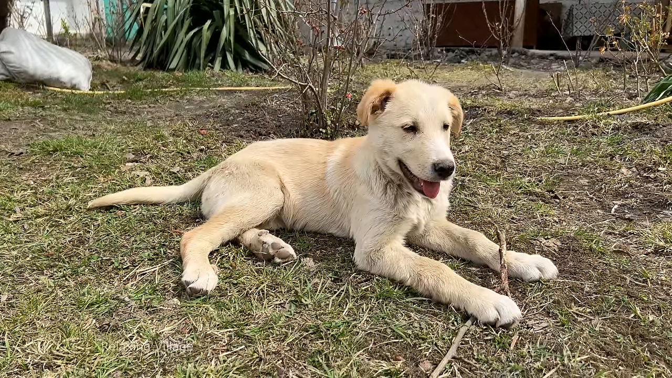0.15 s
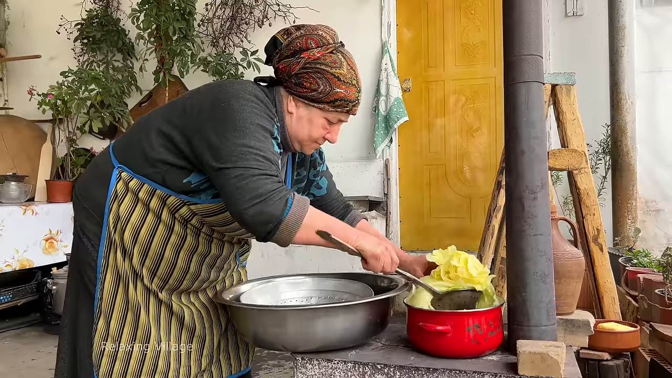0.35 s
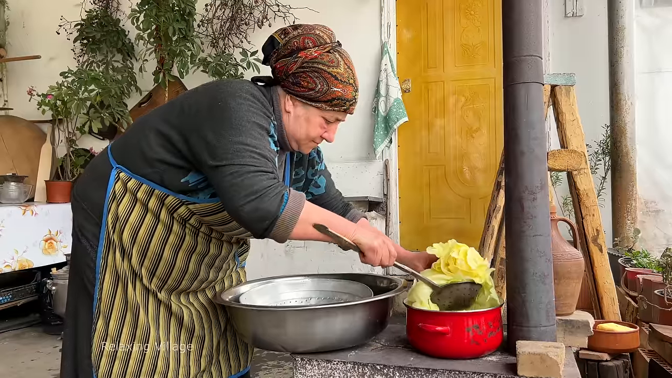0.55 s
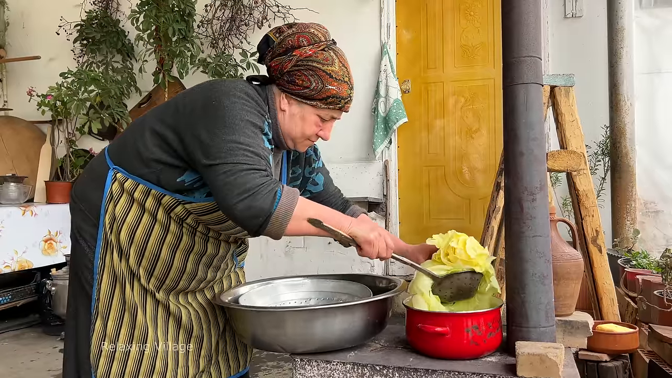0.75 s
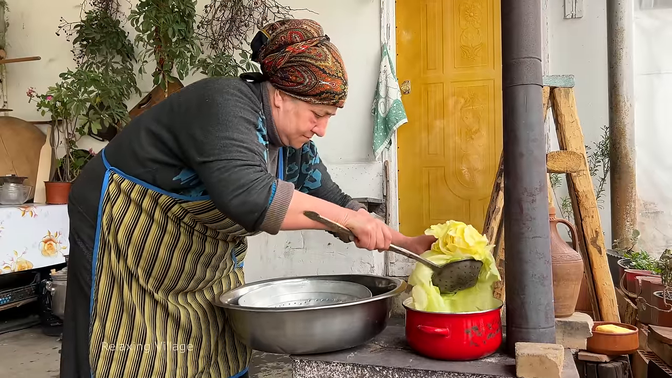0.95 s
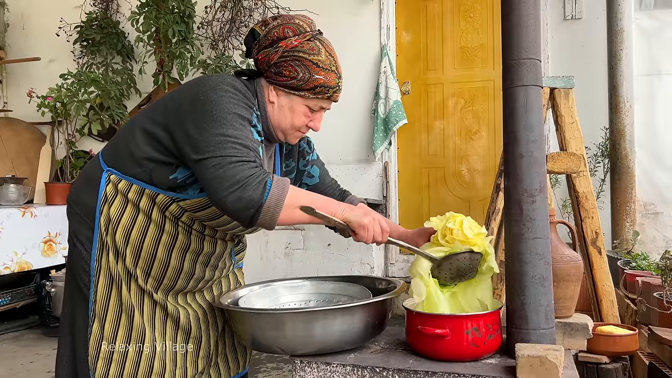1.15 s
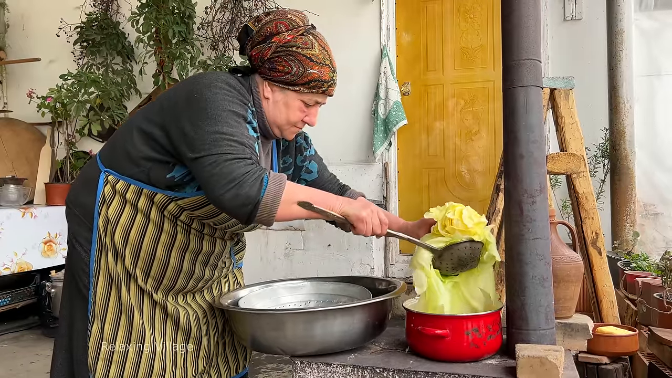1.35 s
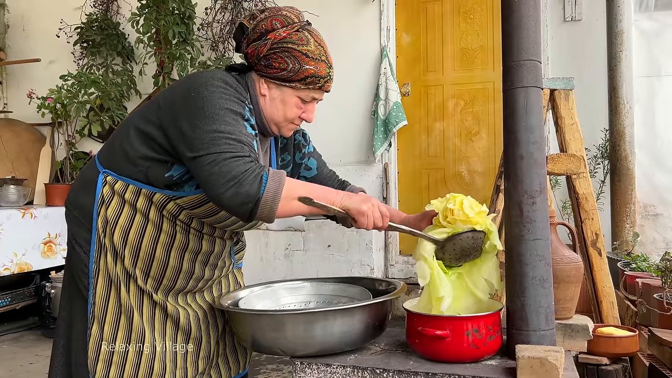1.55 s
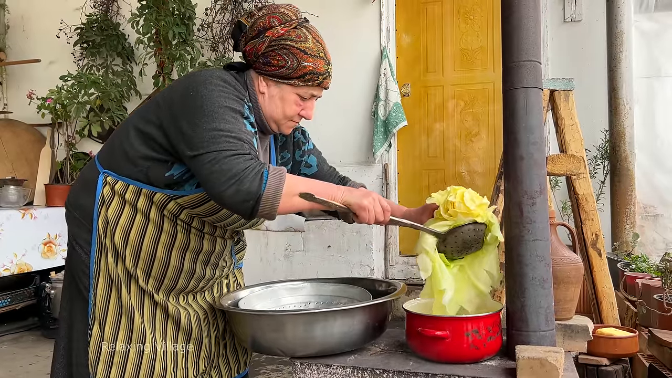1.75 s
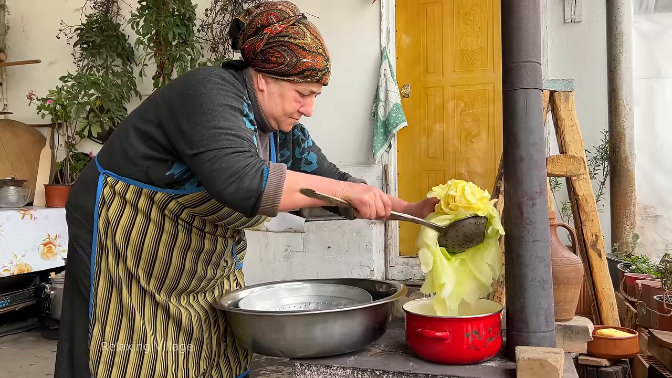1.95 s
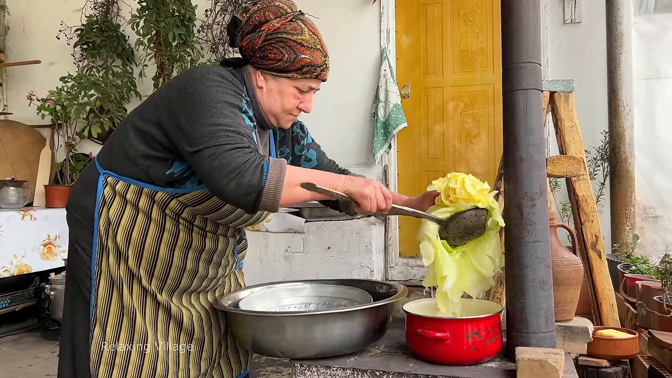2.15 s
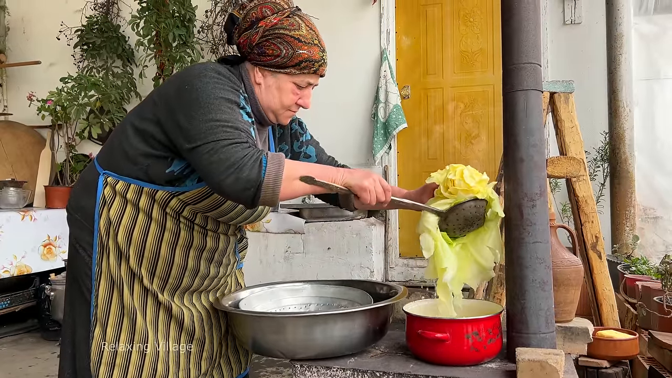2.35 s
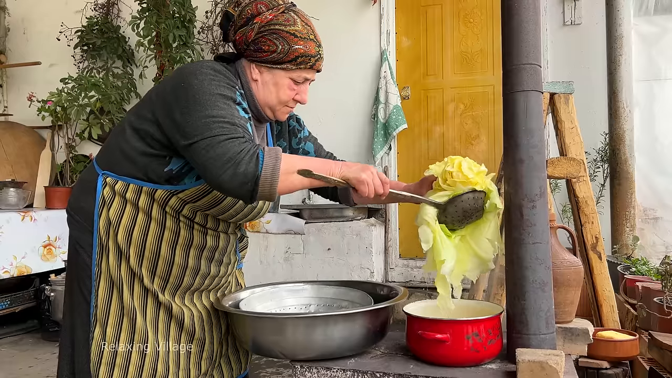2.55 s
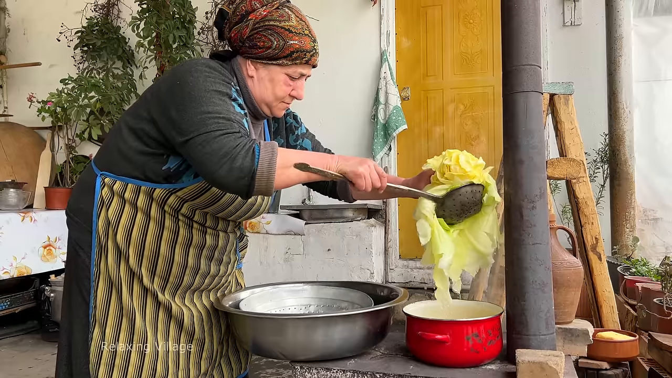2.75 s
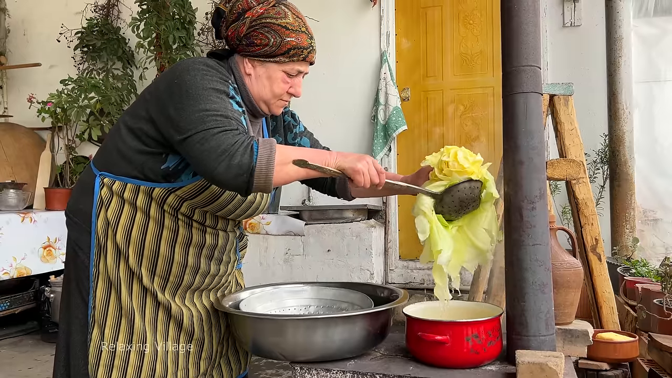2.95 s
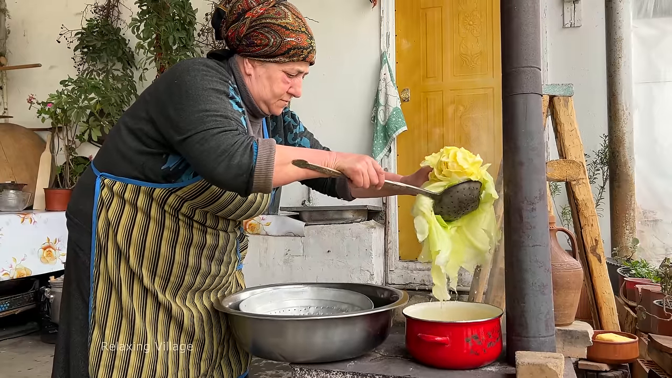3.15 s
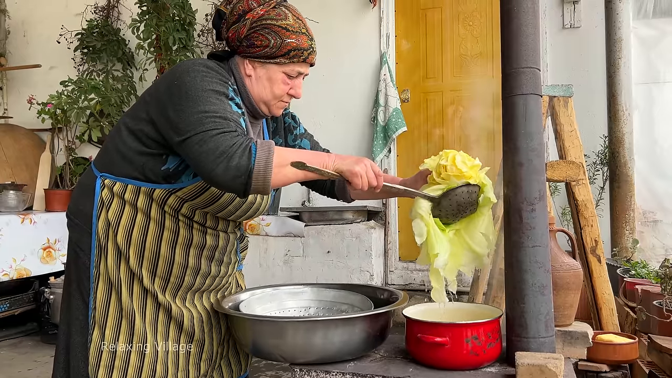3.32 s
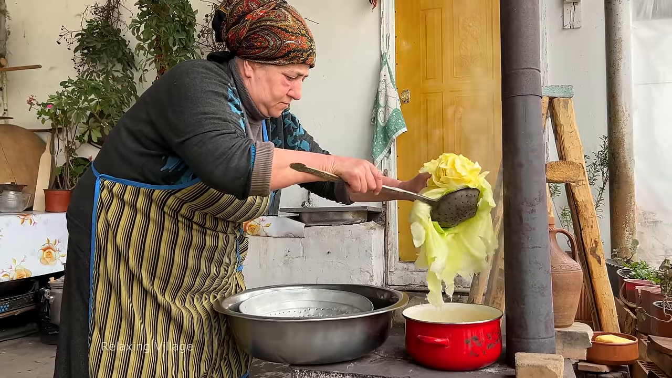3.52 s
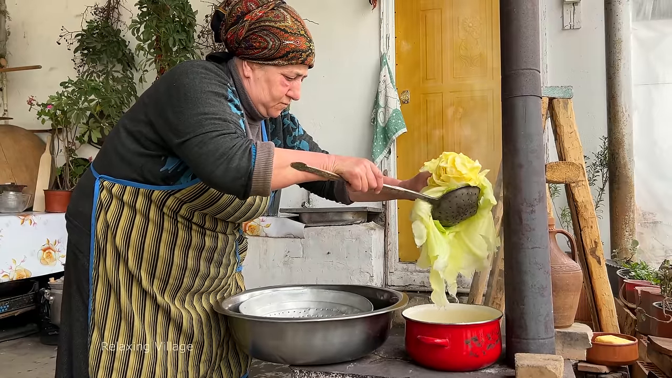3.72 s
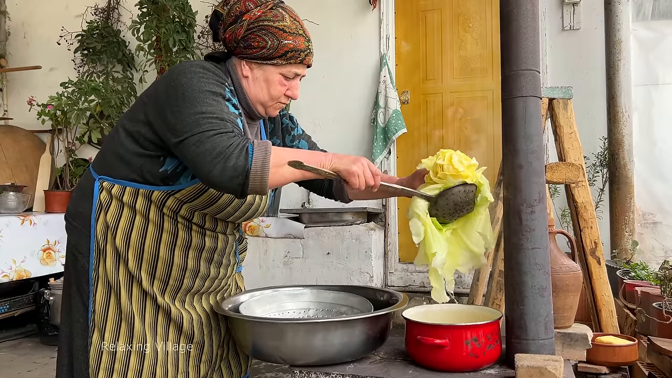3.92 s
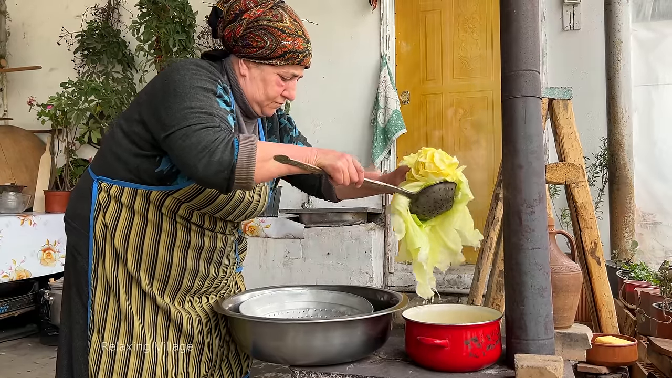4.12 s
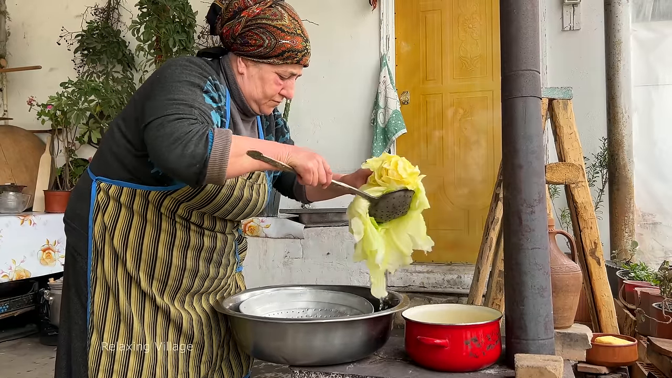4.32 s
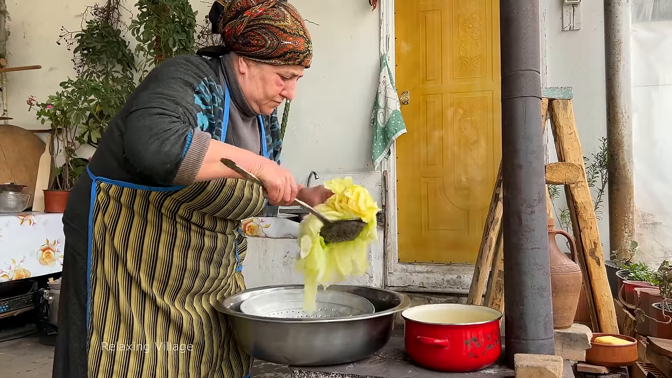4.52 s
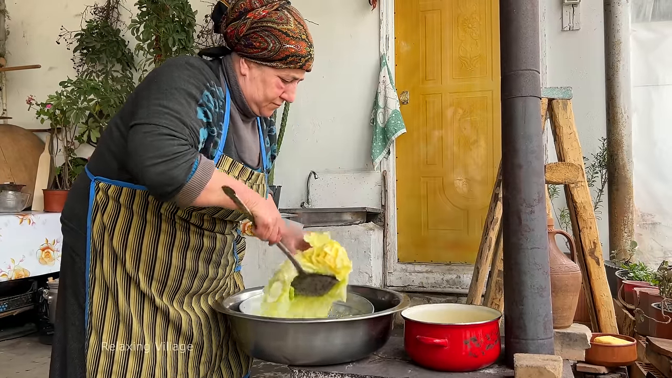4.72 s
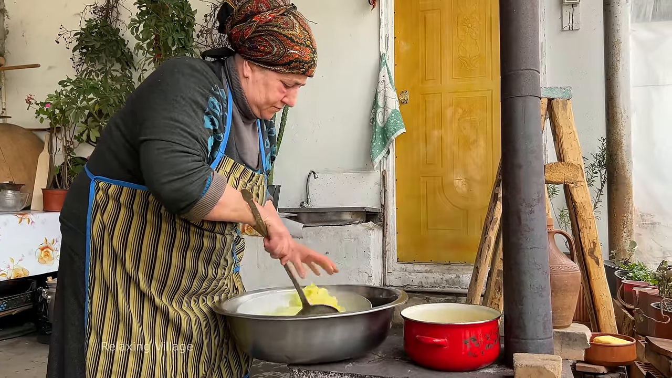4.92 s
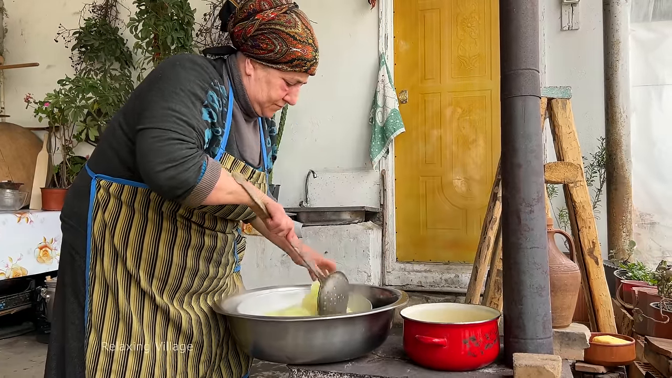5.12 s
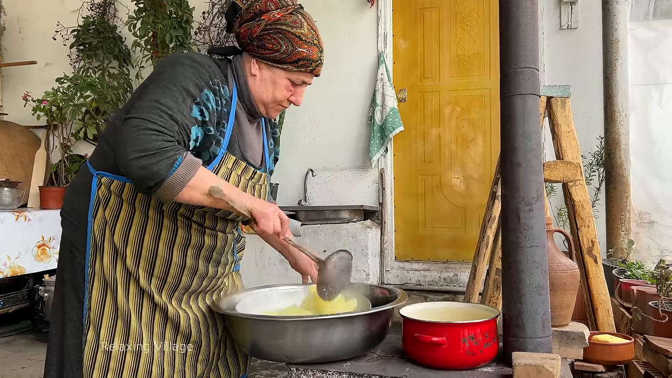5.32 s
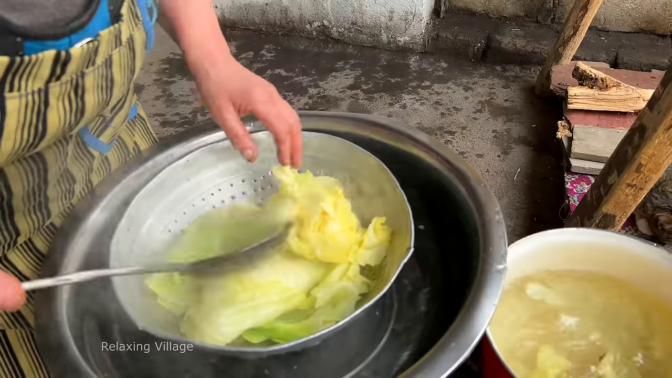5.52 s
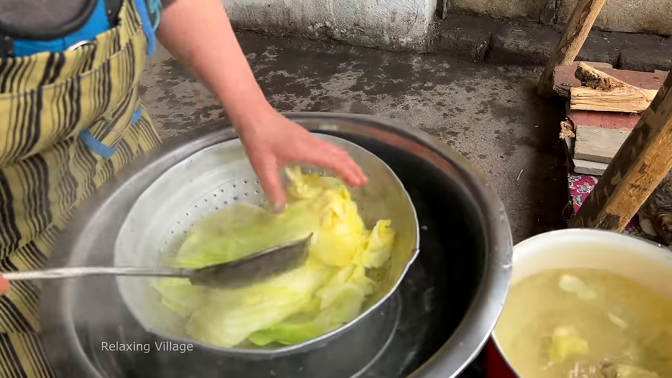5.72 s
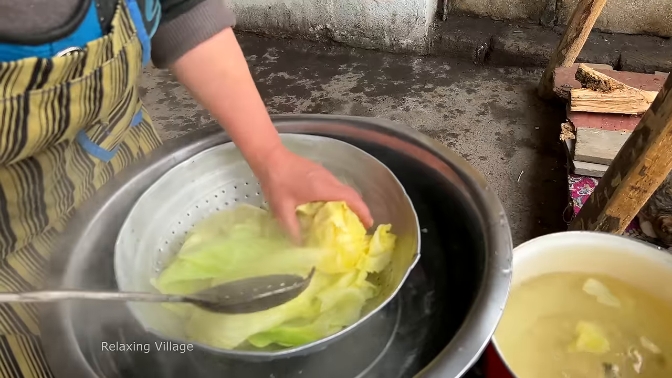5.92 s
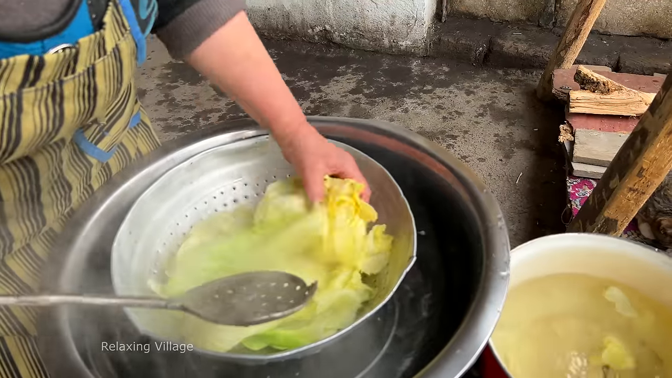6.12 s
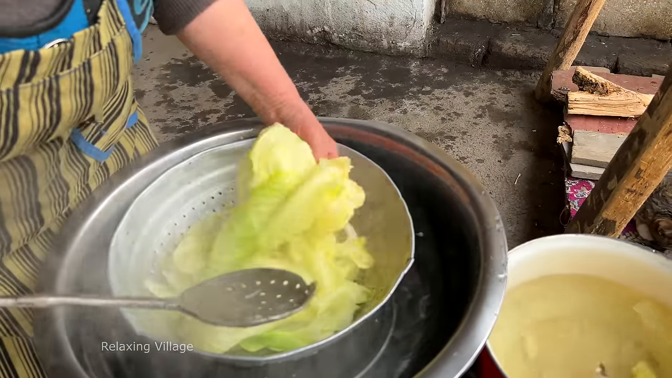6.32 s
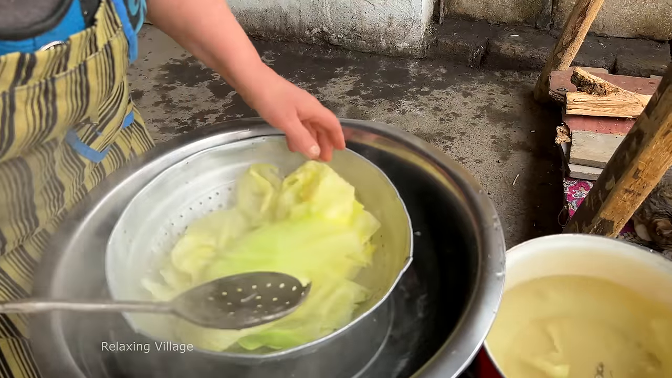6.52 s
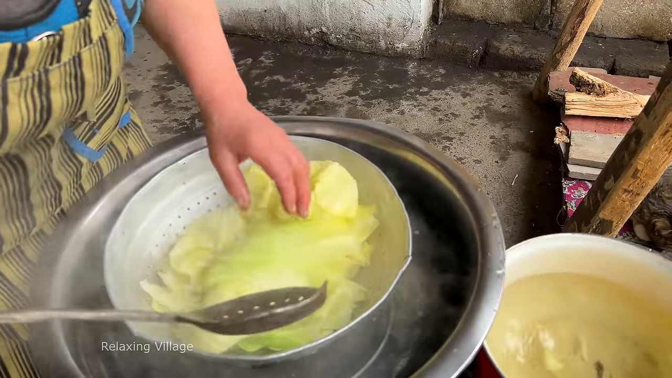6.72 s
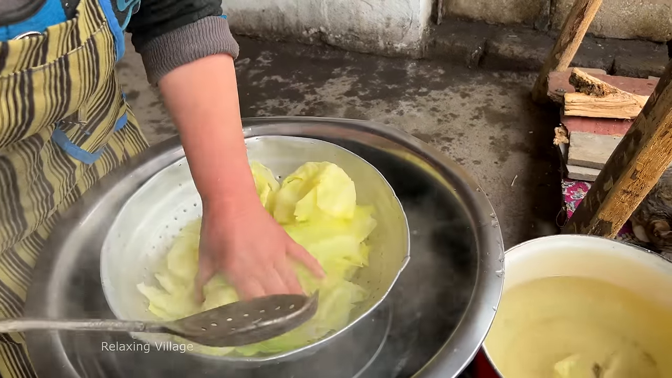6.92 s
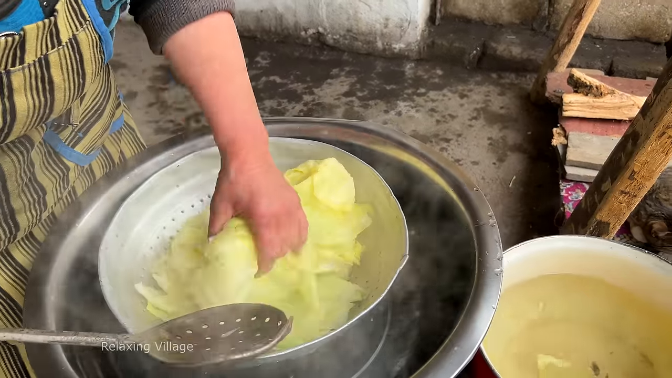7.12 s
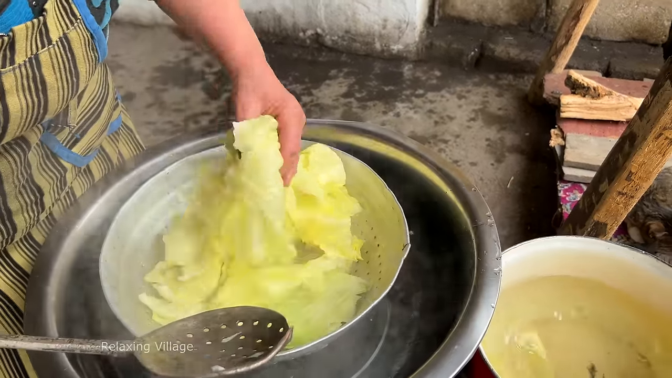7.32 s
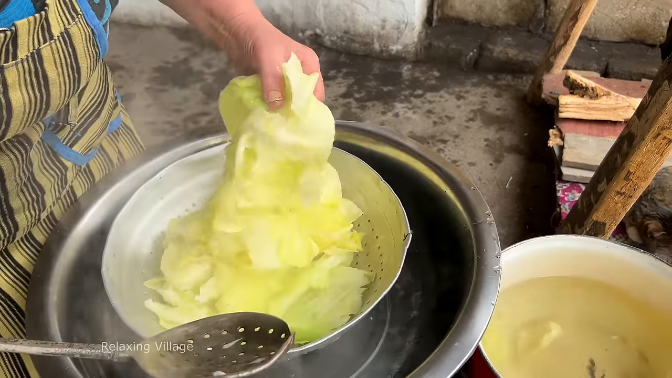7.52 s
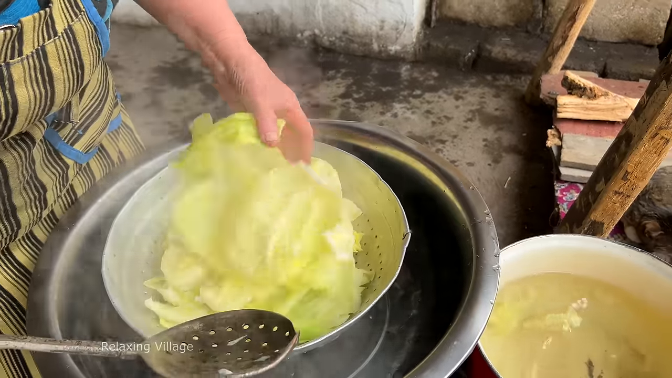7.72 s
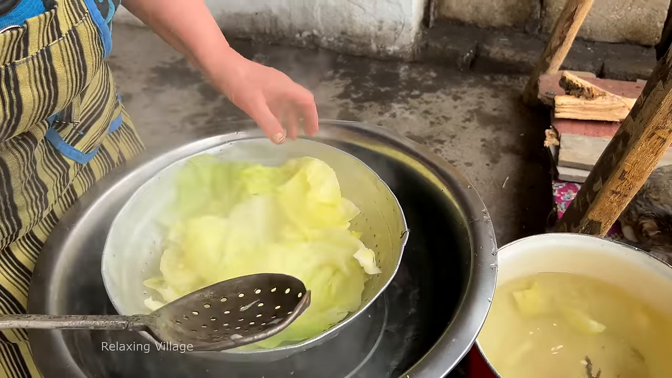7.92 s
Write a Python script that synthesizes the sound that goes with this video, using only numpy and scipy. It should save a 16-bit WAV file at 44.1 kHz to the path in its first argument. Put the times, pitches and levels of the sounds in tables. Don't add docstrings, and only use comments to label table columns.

```python
import sys
import numpy as np
from scipy import signal
from scipy.fft import rfft, irfft, next_fast_len
from scipy.io import wavfile
from scipy.ndimage import uniform_filter1d, map_coordinates

SR = 44100
rng = np.random.default_rng(int(sys.argv[2]) if len(sys.argv) > 2 else 0)


def wav_record(signal):
    frames = np.transpose(np.atleast_2d(signal))
    bounded = np.clip(frames, -1, 1)
    quanta = np.round(bounded * 32767).astype(np.int16)
    wavfile.write(sys.argv[1], SR, quanta)


def undo_db(level):
    steps = np.asarray(level, float) / 20
    return 10 ** steps


N = 355446

# time in seconds, level in dB.
AIR_RUMBLE = [(0.0, -57), (0.09, -57.5), (0.54, -66.5), (0.76, -70.5), (1.28, -65), (1.8, -70), (2.31, -59),
              (2.69, -60), (2.92, -60.5), (3.14, -56), (3.46, -64), (3.66, -55), (3.81, -55), (4.02, -60),
              (4.37, -53), (4.69, -59), (4.96, -53), (5.39, -65), (5.57, -64), (5.72, -57), (6.04, -64),
              (6.58, -58), (6.89, -64), (8.06, -62.5)]
# frequency in Hz, density in dB per Hz.
RUMBLE_COLOUR = [(13, -32), (22, -22.5), (35, -17), (54, -0.5), (102, 1), (162, -5.5), (200, -4.5),
                 (260, -30), (440, -120)]
# time in seconds, pitch in Hz, drone level in dB, sub-bass level in dB.
ENGINE = [(3.52, 66, -66, -69), (3.564, 65.5, -40, -42), (3.682, 65.4, -33, -55), (3.742, 67.7, -42, -53),
          (3.852, 66.4, -28, -52), (3.916, 70.9, -40.5, -44), (4.144, 68, -40.5, -46),
          (4.188, 63.5, -37.5, -48), (4.208, 64.5, -48, -53), (4.242, 66.8, -33.5, -51),
          (4.348, 66.9, -34, -59), (4.406, 67, -46.5, -54), (4.516, 66.5, -33.5, -48),
          (4.59, 66.7, -46, -56), (4.634, 70, -35.5, -63), (4.748, 73.1, -49, -63), (4.842, 72.2, -41, -73),
          (4.982, 71.1, -48, -63), (5.224, 71.9, -59.5, -61), (5.3, 70.6, -55, -90)]

# time in seconds, peak in dB, pitch in Hz.
DRIPS = [
    (0.588, -66, 608),
    (0.615, -44, 1410),
    (0.69, -41.5, 760),
    (0.846, -38, 1870),
    (0.954, -38.5, 756),
    (1.048, -35.5, 2360),
    (1.196, -43.5, 1740),
    (1.322, -32.5, 696),
]
# time in seconds, peak in dB, pitch in Hz.
PLOPS = [(1.396, -39, 1190), (1.945, -46, 820), (2.022, -35, 824), (2.097, -42, 1260), (2.122, -45, 794),
         (2.151, -44, 638), (2.166, -36.5, 795), (2.363, -54, 1130), (2.473, -39, 1260), (2.627, -41, 690),
         (2.729, -45, 760), (2.747, -33, 814), (2.768, -42, 650), (2.797, -31.5, 662), (2.815, -33.5, 1194),
         (2.862, -36.5, 800), (2.898, -52, 870), (2.912, -34, 1220), (3.054, -40.5, 740),
         (3.095, -38.5, 853), (3.104, -41, 760), (3.118, -34, 1320), (3.128, -35, 804), (3.156, -31.5, 758),
         (3.177, -38.5, 797), (3.198, -35, 787), (3.209, -36, 729), (3.248, -37, 802), (3.291, -42, 617),
         (3.31, -40, 1210), (3.349, -44, 820), (3.369, -35.5, 810), (3.384, -36, 837), (3.505, -41, 1220),
         (3.614, -43.5, 781), (3.677, -50, 556), (3.678, -35.5, 815), (3.761, -32.5, 843),
         (3.996, -33.5, 775), (4.07, -41.5, 1290), (4.095, -35.5, 1050), (4.162, -37.5, 1200),
         (4.221, -35.5, 1140), (4.385, -56, 1220), (4.412, -32, 1390), (4.414, -26, 1066)]
# time in seconds, peak in dB, pitch in Hz.
SMALL_DROPS = [(0.5887, -48.5, 3130), (0.6895, -50, 1720), (0.9438, -51, 2200), (0.965, -44.5, 1410),
               (1.3214, -34, 2600), (1.3962, -34, 2600), (3.4241, -41, 1590), (3.5043, -42, 1620),
               (4.4711, -30.5, 1670), (5.7424, -50, 1890), (6.464, -39, 2860)]
# time in seconds, peak in dB, pitch in Hz.
SKIMMER_RINGS = [
    (.975, -57, 1350),
    (1.056, -60, 2550),
    (6.506, -49, 2800),
    (6.53, -49, 3300),
    (6.735, -54, 5500),
]
# time in seconds, peak in dB, pitch in Hz.
LEAF_TICKS = [(5.498, -36.5, 4930), (5.522, -46, 1030), (5.63, -39, 1110), (5.767, -51, 802),
              (6.469, -44, 1140), (6.51, -39, 2800), (6.54, -32, 3300), (6.589, -34.5, 864),
              (6.915, -44, 2450), (7.11, -44, 2950), (7.283, -29.5, 3520), (7.354, -31.5, 1170),
              (7.562, -40, 880), (7.579, -33, 899), (7.773, -51, 1290), (7.798, -41.5, 1180),
              (7.962, -47, 890)]
# time in seconds, peak in dB, pitch in Hz.
FLOOR_THUDS = [(4.416, -27, 114), (4.846, -17, 256.5), (5.528, -33, 225), (5.57, -31, 236),
               (5.59, -25.5, 215), (5.766, -32.5, 213), (5.978, -36, 240), (6.266, -43, 224),
               (6.461, -40, 292), (6.588, -38, 226), (7.354, -33, 189), (7.573, -35, 216),
               (7.901, -39, 288), (7.975, -45, 233)]
# time in seconds, peak in dB, crack in dB, spray in dB (both relative), T60 in seconds.
KNOCKS = [(3.115, -39, -2.5, 3, 0.073), (4.412, -25, -33, -1, 0.053), (4.846, -12.5, -31, -27, 0.065),
          (4.891, -13, -33, -33, 0.09), (4.941, -13.5, -12, -14, 0.048), (5.53, -33, -33, -27, 0.024),
          (5.588, -24.5, -41, -31, 0.088), (5.631, -36.5, -7, -13, 0.13), (5.739, -37.5, -13, -20, 0.031),
          (5.768, -31, -20, -25, 0.027), (5.867, -52.5, -8, -9, 0.044), (5.979, -36, -11, -17, 0.067),
          (6.46, -32, -13, -22, 0.057), (6.537, -43.5, -7, 10, 0.038), (6.587, -31, -30, -20, 0.074),
          (6.739, -39, -16, -10, 0.067), (6.857, -53, -4, 17, 0.037), (6.914, -49, 1.5, 5, 0.089),
          (7.111, -45, -16, -18, 0.073), (7.281, -44, -4, -7, 0.079), (7.351, -39, -34, 11.5, 0.098),
          (7.564, -30, -20, -19, 0.13), (7.777, -41.5, -33, -20, 0.06), (7.819, -37.5, -6, 0, 0.086),
          (7.973, -35.5, -37, -31, 0.098)]

# frequency in Hz, width in Hz, level in dB.
COLANDER_MODES = [(216, 22, 1.5), (247, 11.7, 6.5), (300.4, 17.3, 0.5), (368, 67, -4.5), (457, 31, 1.5),
                  (537, 23, 6.5), (623, 62, -1), (698, 28, -1), (819, 30, -3), (933, 45, -7),
                  (1126, 49, -7), (1600, 29, -10.5), (2130, 150, -32.5)]
# frequency in Hz, width in Hz, level in dB.
POT_MODES = [(747, 217, -15), (1220, 47, 1.5), (1870, 210, 2), (2680, 190, -4)]
# frequency in Hz, density in dB per Hz.
VESSEL_COLOUR = [(90, -76), (150, -14.5), (200, -6.5), (340, -1.5), (650, -12.5), (1200, -13.5),
                 (1700, -37), (2600, -120)]
# frequency in Hz, density in dB per Hz.
SLOSH_COLOUR = [(350, -25), (600, -10), (1100, -11), (2100, -15), (3500, -13.5), (6000, -22.5),
                (10000, -67)]
# frequency in Hz, density in dB per Hz.
STOVE_COLOUR = [(1600, -13.5), (2800, -1.5), (3600, -6), (4500, -4.5), (5700, 0), (7500, 0), (9000, 2),
                (10200, -2), (12000, -5), (13900, -6), (15300, 0), (16000, -11)]
# frequency in Hz, density in dB per Hz.
SPRAY_COLOUR = [(1600, -8.5), (3000, -2.5), (4500, -2), (6000, -2.5), (8500, -5.5), (10200, -6),
                (12000, -16.5), (13900, -19.5), (16000, -13)]

# time in seconds, vessel in dB, slosh in dB, fizz in dB.
LIFTING = [
    [(0.0, -47.5, -48, -53), (0.056, -43, -48.5, -53.5), (0.284, -44, -48.5, -53.5), (0.294, -35, -47, -54)],
    [(0.296, -65, -79, -86), (0.306, -65.5, -76, -83), (0.716, -66, -68, -77.5), (0.91, -68, -69, -79),
     (0.946, -64, -64, -77.5), (1.08, -69.5, -62, -73), (1.298, -63.5, -67.5, -91), (1.318, -66, -57, -79)],
    [(1.32, -60, -41, -52.5), (1.34, -62, -53.5, -54), (1.45, -62, -50.5, -47), (1.73, -66, -49.5, -43.5),
     (1.89, -70, -56, -50), (2.03, -54.5, -50, -49), (2.39, -61.5, -49, -43.5), (2.74, -55.5, -50.5, -46.5),
     (2.81, -58, -52, -47.5), (2.85, -64.5, -50.5, -46), (3.21, -57.5, -52, -48), (3.55, -67, -56, -48.5),
     (3.62, -51.5, -59.5, -49.5), (4.06, -59.5, -59, -50.5), (4.12, -46, -52, -49.5),
     (4.38, -56, -54.5, -51), (4.43, -46, -43.5, -46), (4.47, -50, -47.5, -45.5), (4.72, -61.5, -57, -47.5),
     (4.81, -52, -54, -50), (4.83, -47, -45, -48)],
]
# time in seconds, vessel in dB, slosh in dB, fizz in dB.
SPLASH = [
    (4.84, -36, -54, -54),
    (4.854, -21, -39, -30),
    (4.93, -24, -30.5, -42.5),
    (4.948, -34, -26, -27),
    (5.102, -43, -53, -52.5),
    (5.176, -45, -53, -45),
    (5.254, -59, -58.5, -55),
    (5.386, -64.5, -52.5, -52),
    (5.466, -79, -65, -53),
]
# time in seconds, vessel in dB, slosh in dB, fizz in dB.
HANDLING = [
    [(5.47, -63, -69, -77), (5.488, -60, -66, -77), (5.496, -59, -62, -54), (5.552, -58, -67, -70),
     (5.638, -47, -52, -51), (5.704, -55.5, -68, -62.5), (5.938, -59, -62.5, -64), (5.97, -61, -56, -66)],
    [(5.97, -57, -64, -52.5), (5.99, -44, -55, -46.5), (6.07, -64.5, -58.5, -53.5), (6.39, -58, -64, -59.5),
     (6.59, -51, -61, -65.5), (6.61, -53, -53, -45), (6.69, -48.5, -60, -61), (6.77, -57, -57, -52),
     (6.84, -60, -67, -69.5), (6.91, -58.5, -62.5, -55), (7.1, -63, -66, -69.5), (7.12, -54.5, -61, -56),
     (7.22, -64.5, -67.5, -83), (7.27, -56, -63, -74), (7.29, -57, -57, -46), (7.34, -51.5, -61, -58.5),
     (7.36, -49, -62, -46.5), (7.43, -49.5, -57, -55.5), (7.56, -64, -65, -65.5),
     (7.57, -57.5, -57.5, -59.5), (7.75, -59, -67.5, -86), (7.83, -48.5, -57.5, -52.5),
     (7.95, -62, -70, -88.5), (7.98, -55, -56.5, -80), (8.06, -62, -67, -83)],
]
# start in seconds, end in seconds.
SIZZLING = [
    (1.32, 4.83),
    (5.1, 5.466),
]
# start in seconds, end in seconds.
STEAMING = (5.7, 6.45)

# frequency in Hz, T60 in seconds.
YARD_DECAY = [(200, .16), (2000, 0.17), (10000, 0.029)]
# frequency in Hz, left-right likeness from 0 to 1.
PORT_LIKENESS = [(60, .995), (150, .985), (300, .96), (700, .9), (1500, .7), (3000, .5), (5000, .45),
                 (9000, .83), (12000, .83), (15000, .75)]
# frequency in Hz, lead of the left in radians.
PORT_LEAD = [(0, 0), (1120, -.2), (1550, -1.3), (2500, .9), (3270, 1.3), (4480, .9), (5340, -.4),
             (7490, .9), (8350, .1), (10250, -3.14), (12100, -6.3), (13900, -9.42), (15400, -12.4),
             (16400, -12.6)]
# frequency in Hz, left minus right in dB.
PORT_TILT = [(60, .5), (200, .6), (380, 1.2), (700, 2), (1290, 0), (2380, -.5), (4400, 4.5), (8120, 1),
             (15000, 0)]


def unit(x):
    return x / np.sqrt(np.mean(x ** 2) + 1e-20)


def along(points, hz):
    f, v = np.transpose(points)
    return np.interp(np.log(hz + 1), np.log(f + 1), v)


def curves(rows):
    s, *cols = np.transpose(rows)
    return [np.interp(np.arange(N) / SR, s, c, left=-150, right=-150) for c in cols]


def wobble(rate):
    knots = rng.standard_normal(int(N * rate / SR) + 4)
    return map_coordinates(knots, [np.arange(N) * rate / SR])


def filtered(x, response):
    m = next_fast_len(N + SR // 2)
    return irfft(rfft(x, m) * response(np.fft.rfftfreq(m, 1 / SR)), m)[..., :N]


def resonances(modes):
    def response(f):
        total = 0
        for k, (centre, width, db) in enumerate(modes):
            damping = 1j * f * width
            total = total + (-1) ** k * undo_db(db) * damping / (centre * centre - f * f + damping)
        return total
    return response


def bursts(rate, spread_db, life):
    chance, size = rng.random(N), rng.exponential(size=N)
    starts = (chance < rate / SR) * undo_db(spread_db * np.minimum(size, 3))
    return unit(signal.lfilter([1], [1, -np.exp(-1 / (life * SR))], starts))


def patchy(depth_db):
    z = signal.stft(rng.standard_normal((2, N)), nperseg=512)[2]
    field = uniform_filter1d(rng.standard_normal(z.shape[1:]), 6, 0)
    field = uniform_filter1d(field, 8, 1)
    return signal.istft(z * undo_db(depth_db * unit(field)), nperseg=512)[1][:, :N]


def yard(x, wet_db):
    hz, t, z = signal.stft(rng.standard_normal((2, SR // 3)), SR, nperseg=256)
    decay = undo_db(-60 * t / along(YARD_DECAY, hz)[:, None])
    tail = signal.istft(z * decay, SR, nperseg=256)[1]
    echo = signal.fftconvolve(x[None], tail / np.linalg.norm(tail[0]), axes=1)[:, :N]
    return np.array([x + undo_db(wet_db) * echo[0], undo_db(-1) * echo[1]])


def background():
    air_db, = curves(AIR_RUMBLE)
    rumble = unit(filtered(patchy(0.99), lambda f: undo_db(along(RUMBLE_COLOUR, f))))
    rumble = undo_db(air_db + 6 + 4.2 * wobble(9)) * rumble
    hz, level_db, sub_db = curves(ENGINE)
    tone = np.sin(2 * np.pi * np.cumsum(hz + 1.28 * wobble(15)) / SR)
    drone = np.sqrt(2) * undo_db(level_db + .8 * wobble(25)) * tone
    sub = unit(filtered(rng.standard_normal(N), lambda f: resonances([(44, 14, 0)])(f) ** 2))
    return rumble + (drone + undo_db(sub_db) * sub) * [[1], [1]]


def grass():
    t = np.arange(N // 20) / SR
    cracks = rng.random((2, len(t))) < 260 / SR
    crunch = cracks * rng.standard_normal((2, len(t))) * (t < .29)
    crunch = np.pad(crunch, ((0, 0), (0, N - len(t))))
    return undo_db(-1.5) * filtered(crunch, lambda f: resonances([(330, 260, 0)])(f) ** 2)


def drops(rows, cycles, swell, rise, tick_db):
    out, t = np.zeros(N + SR), np.arange(SR // 12) / SR
    for s, db, hz in rows:
        fade = t * hz / cycles
        bubble = np.sin(2 * np.pi * hz * t * (1 + rise * fade))
        bubble = bubble * np.exp(-fade) * (1 - np.exp(-t * hz / swell))
        contact = uniform_filter1d(rng.standard_normal(len(t)), size=4)
        tick = undo_db(tick_db - 60 * t / .008) * contact
        out[round(s * SR):][:len(t)] += undo_db(db - 0.5) * (bubble + tick)
    return yard(out[:N], wet_db=-10)


def froth(rate, hz, octaves, cycles, spread_db):
    draw = rng.random((2, int(rate * N / SR), 3))
    when, detune, size = draw[..., :1], draw[..., 1:2], draw[..., 2:]
    pitch = np.clip(hz * 2 ** (octaves * (2 * detune - 1)), 200, 15000)
    turns = pitch * np.arange(256) / SR
    tones = undo_db(-spread_db * np.log(size + 0.016)) * np.sin(2 * np.pi * turns) * np.exp(-turns / cycles)
    tones = tones * np.hanning(512)[256:]
    where = (when * N).astype(int) + np.arange(256)
    rows = [np.bincount(w.ravel(), v.ravel(), N + 256)[:N] for w, v in zip(where, tones)]
    return unit(np.array(rows))


def knocks():
    push, crack, spray = np.zeros((3, N + SR))
    t = np.arange(SR // 3) / SR
    for s, db, crack_db, spray_db, t60 in KNOCKS:
        shape = undo_db(db - 60 * t / max(t60, .01)) * (1 - np.exp(-t / 0.00057))
        noises = shape * rng.standard_normal((3, len(t)))
        for line, noise, extra_db in zip((push, crack, spray), noises, (0, crack_db, spray_db)):
            line[round(s * SR):][:len(t)] += undo_db(extra_db) * noise

    def band(lo_hz, hi_hz):
        return resonances([((lo_hz * hi_hz) ** .5, hi_hz - lo_hz, 0)])

    ringing = resonances(COLANDER_MODES)
    metal = filtered(push[:N], lambda f: undo_db(8.5) * ringing(f) + undo_db(1.5) * band(350, 1700)(f) ** 2)
    snap = filtered(crack[:N], lambda f: band(1500, 4000)(f) ** 2)
    mist = filtered(spray[:N], lambda f: undo_db(along(SPRAY_COLOUR, f)))
    return yard(metal + undo_db(12) * snap + undo_db(-3) * mist, wet_db=-10.5)


def wet_motion():
    vessel_db, slosh_db, fizz_db = curves(np.vstack(LIFTING + [SPLASH] + HANDLING))
    gush = bursts(rate=32, spread_db=3.5, life=0.025)
    metal, walls = resonances(COLANDER_MODES), resonances(POT_MODES)

    def ring(f):
        return undo_db(along(VESSEL_COLOUR, f)) * (1 + 0.59 * np.abs(metal(f)))

    def hollow(f):
        return undo_db(along(SLOSH_COLOUR, f)) * (1 + 1.34 * np.abs(walls(f)))

    boom = unit(filtered((1 + 0.16 * gush) * patchy(2.9), ring))
    bubbly = patchy(2.15) + 0.19 * froth(160, 1296, 1.13, 7.5, 2.4)
    slosh = unit(filtered((1 + 0.1 * gush) * bubbly, hollow))

    popping = 1 + 0.12 * gush + 0.25 * bursts(500, 5.3, 0.0019)
    crackle = popping * (patchy(0.87) + 0.22 * froth(700, 6646, 1.262, 13, 4.7))
    sizzle = unit(filtered(crackle, lambda f: undo_db(along(STOVE_COLOUR, f))))
    spray = unit(filtered(crackle, lambda f: undo_db(along(SPRAY_COLOUR, f))))
    whistle = undo_db(-2.5) * unit(filtered(crackle, resonances([(8600, 890, 0)])))

    t = np.arange(N) / SR
    hot = sum((t > start) & (t < end) for start, end in SIZZLING)
    steam = (t > STEAMING[0]) & (t < STEAMING[1])
    cool = undo_db(3.3) * spray * (1 - 0.27 * steam) + steam * whistle
    fizz = np.where(hot, undo_db(3.5) * sizzle, cool)
    return undo_db(vessel_db - 1.0) * boom + undo_db(slosh_db + 0.5) * slosh + undo_db(fizz_db) * fizz


def scene():
    water = drops(DRIPS, 2.6, 0.23, 0.018, -29)
    water = water + drops(PLOPS, 5.0, 0.5, 0.014, -9)
    water = water + drops(SMALL_DROPS, 6.1, 0.41, 0.0046, -17.5)
    skimmer = drops(SKIMMER_RINGS, 24, 3, .004, -14)
    leaves = drops(LEAF_TICKS, 3.8, 0.11, 0.017, -3.5)
    floor = drops(FLOOR_THUDS, 2.9, 0.27, 0.005, -40)
    both = background() + grass() + water + skimmer + leaves + floor + knocks() + wet_motion()

    def shares(f):
        angle = np.arccos(np.clip(along(PORT_LIKENESS, f), -1, 1)) / 2
        return np.array([np.cos(angle), np.sin(angle)])

    def ports(f):
        lead = np.interp(f, *np.transpose(PORT_LEAD))
        left = undo_db(along(PORT_TILT, f) / 2) * np.exp(.5j * lead)
        return np.array([left, 1 / left])

    direct, diffuse = filtered(both, shares)
    return filtered(np.array([direct + diffuse, direct - diffuse]), ports)


def band_limit(x):
    return signal.sosfilt(signal.butter(12, 16830, fs=SR, output="sos"), x)


def record(dry):
    dry = filtered(dry, lambda f: f < 15870)
    ceiling = .45
    mix = dry / (1 + np.abs(dry / ceiling) ** 4) ** (1 / 4)
    return band_limit(mix)


dry = scene()
out = record(dry)
wav_record(out)
```